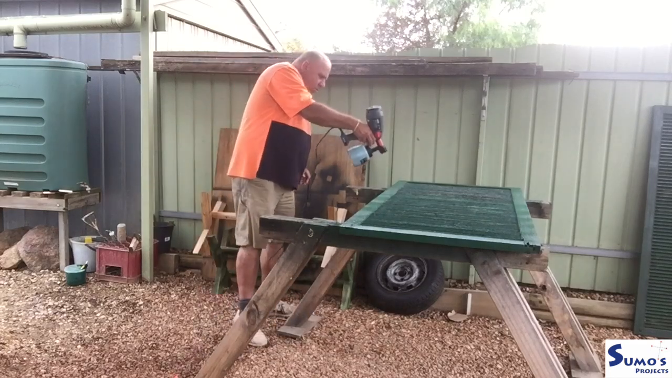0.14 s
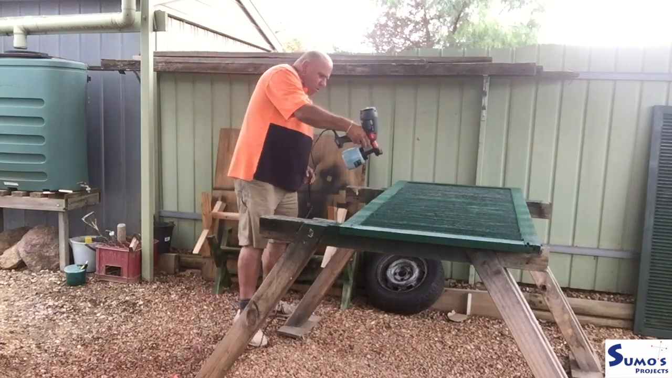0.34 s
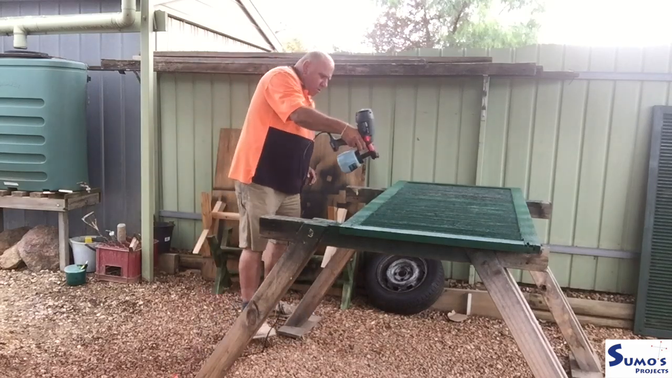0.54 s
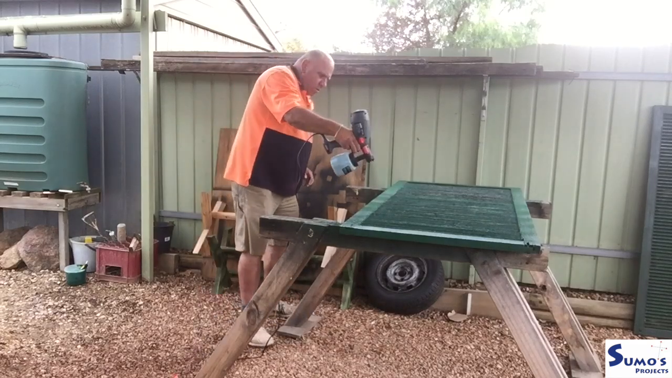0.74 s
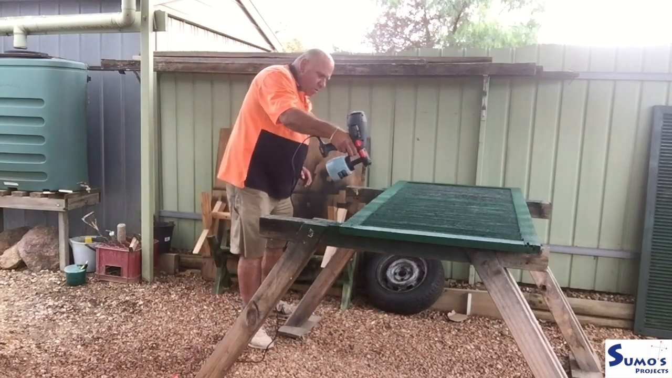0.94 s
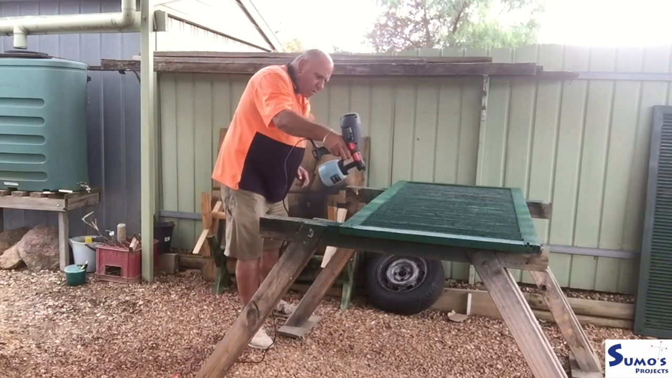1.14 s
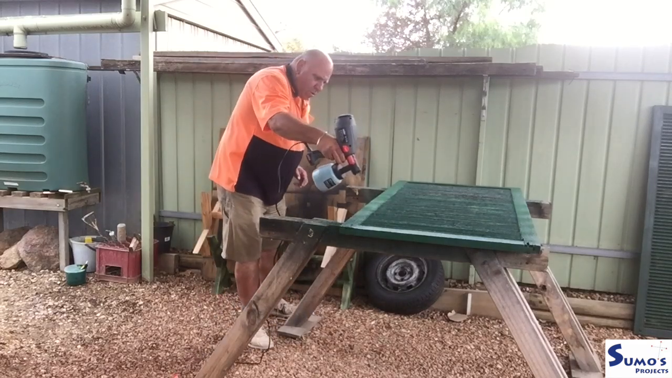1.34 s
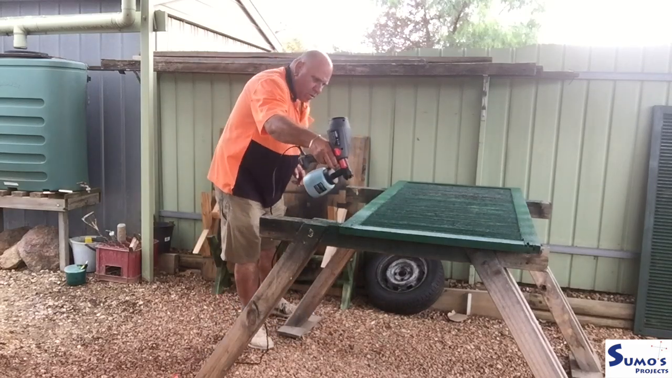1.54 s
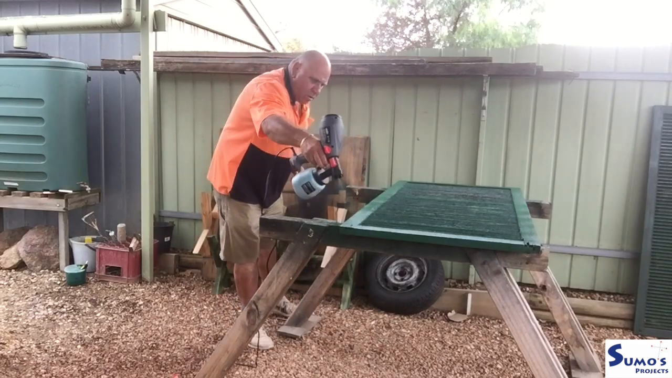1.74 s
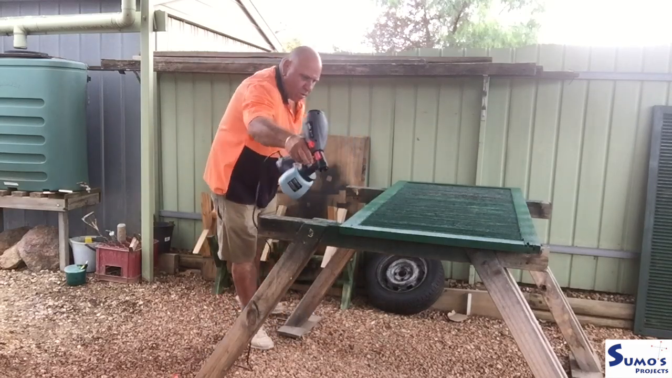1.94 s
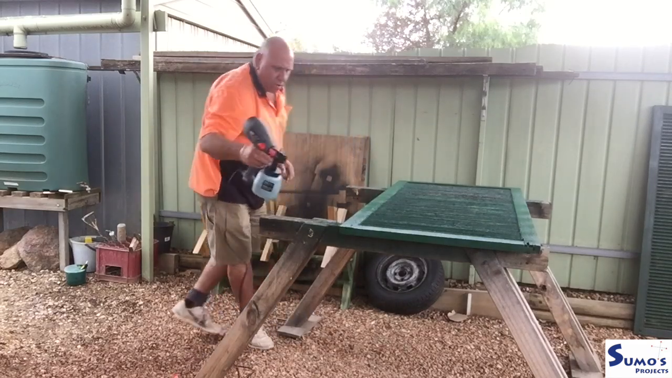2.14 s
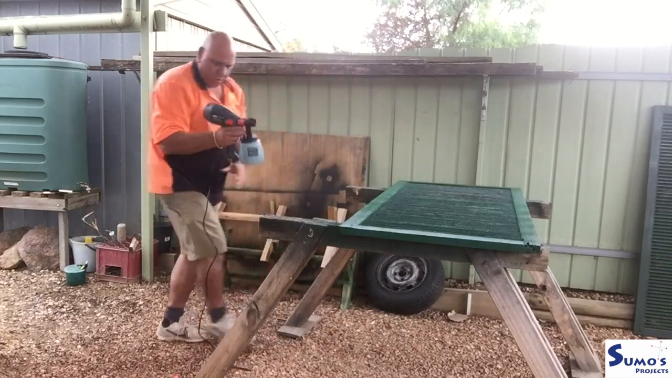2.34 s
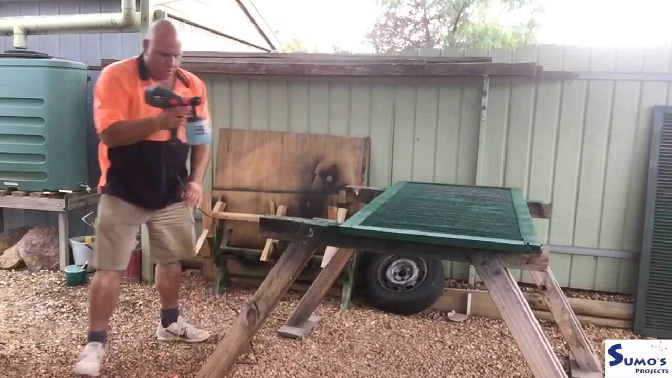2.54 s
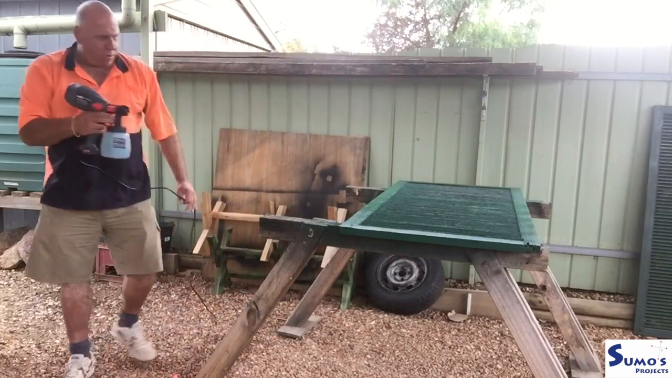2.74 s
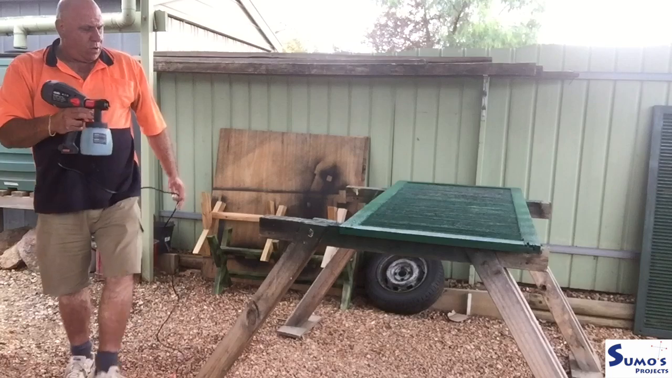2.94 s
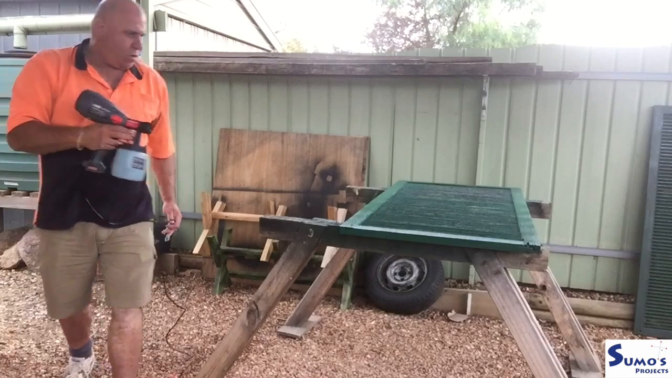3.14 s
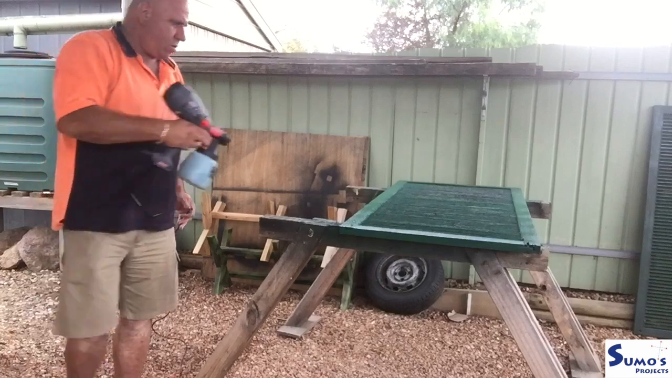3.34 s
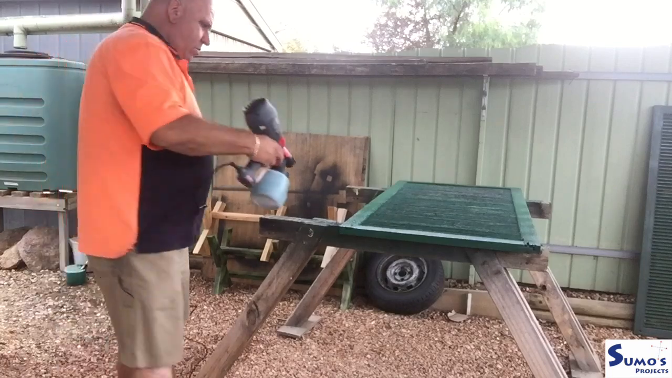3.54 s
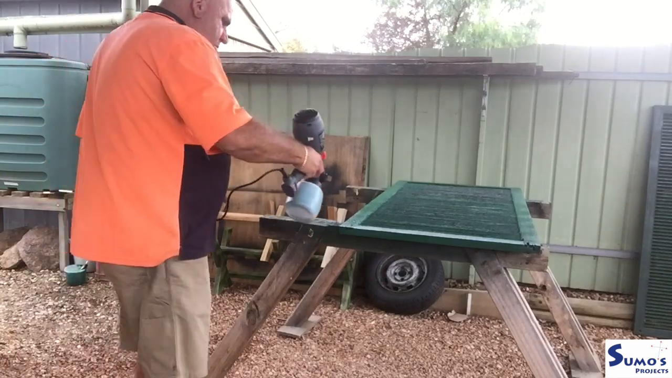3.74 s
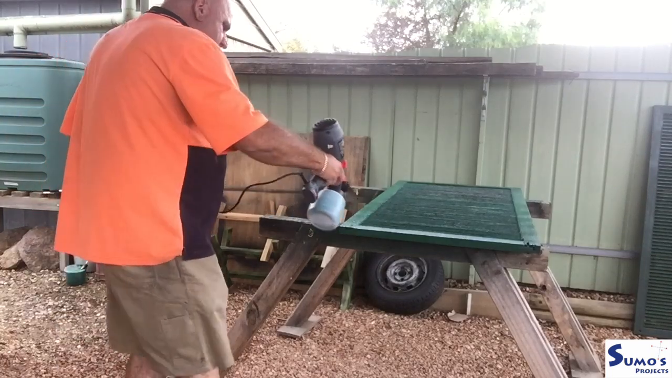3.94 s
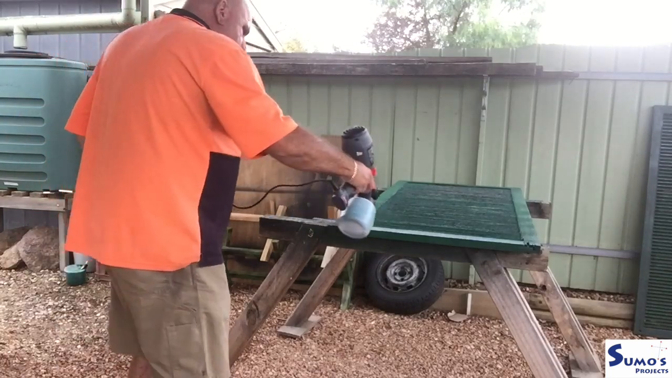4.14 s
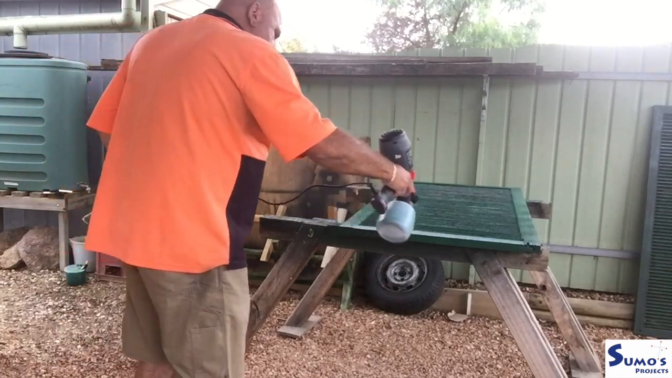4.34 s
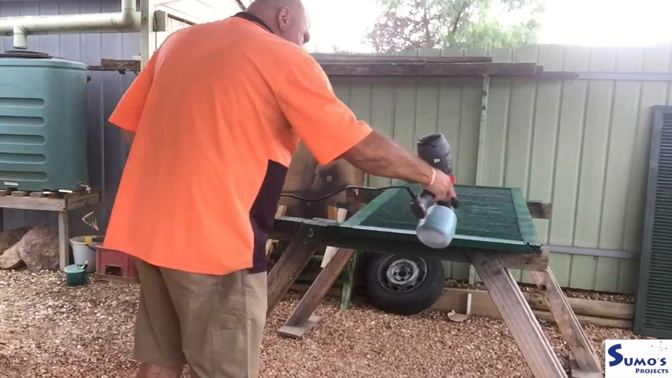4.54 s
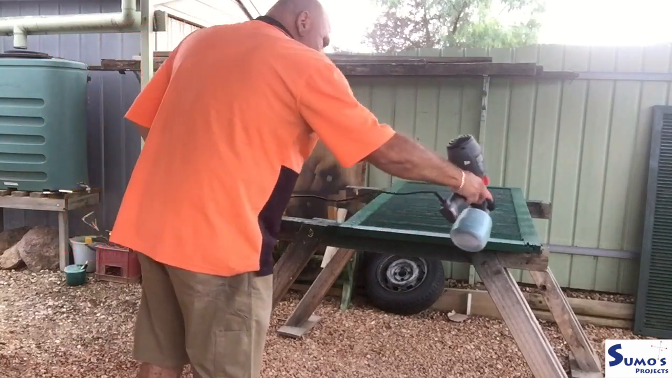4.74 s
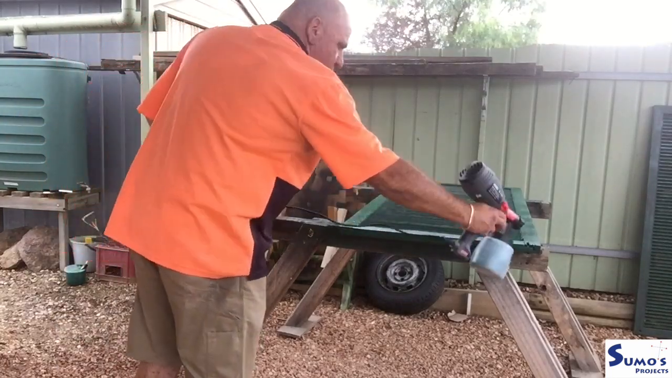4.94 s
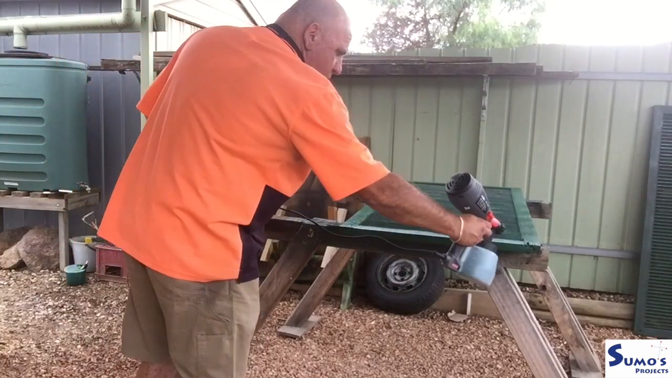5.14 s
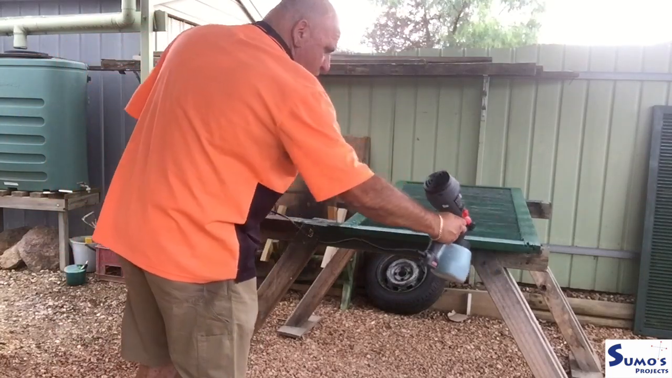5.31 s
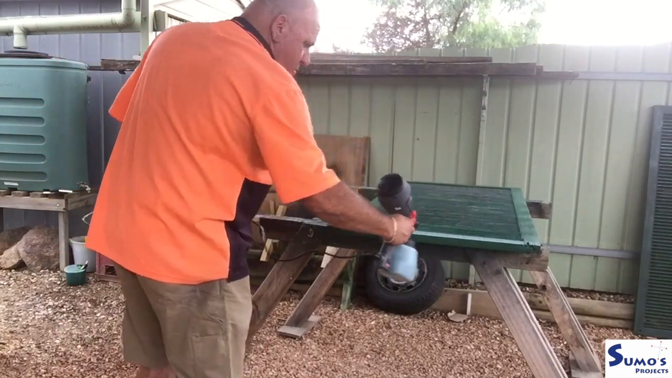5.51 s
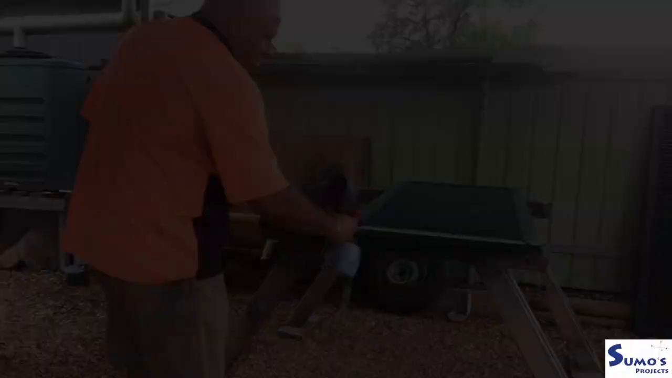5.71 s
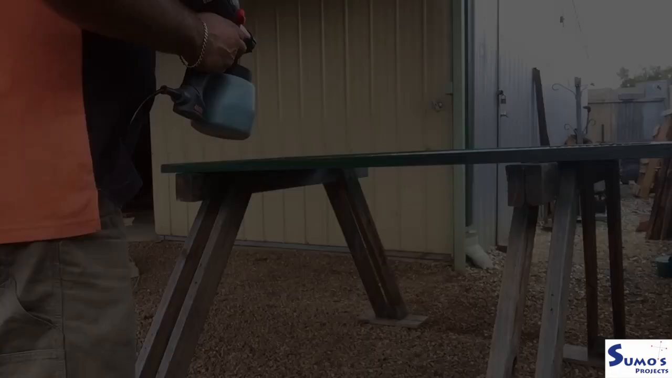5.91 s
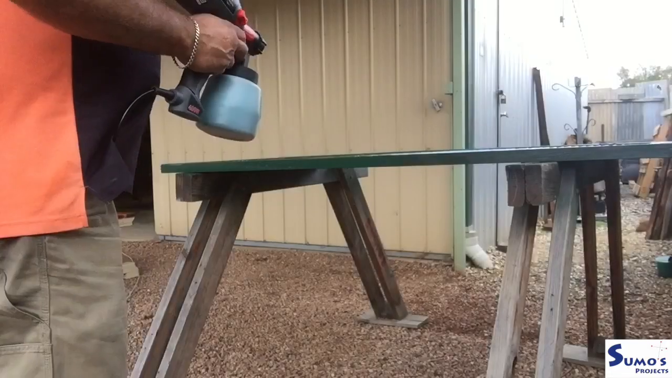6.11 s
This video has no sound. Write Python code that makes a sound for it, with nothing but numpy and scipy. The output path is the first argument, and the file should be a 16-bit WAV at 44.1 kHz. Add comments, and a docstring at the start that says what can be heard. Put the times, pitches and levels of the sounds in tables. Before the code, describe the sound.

Rushing air and a piercing turbine whine wind down, restart with a trigger click nearer, sag briefly, and stop abruptly before shoes crunch wood chips.

```python
"""A rush of air and the whine of a seven-blade turbine are heard first: a handheld electric paint sprayer in a yard.
It coasts down while carried round the bench, clicks on again close by, dips once, and a quiet yard cuts it off.
The air is noise shaped by resonances and echoes; the whine is a sine at the blade rate of a modelled shaft.
A distant engine hums in two orders, a far machine and traffic are coloured noise, and shoes scuff wood chips
in grainy bursts. Both channels carry the same sound."""
import sys
import numpy as np
from scipy import signal
from scipy.fft import rfft, irfft, next_fast_len
from scipy.io import wavfile
from scipy.ndimage import uniform_filter1d, map_coordinates

SR = 44100
rng = np.random.default_rng(int(sys.argv[2]) if len(sys.argv) > 2 else 0)


def materialize(psi):
    """Save the field psi as 16-bit PCM at rate SR to the path in sys.argv[1].

    A 1-D psi becomes a single channel; in a 2-D psi each row is a channel.
    """
    bounded = np.clip(np.atleast_2d(psi).T, -1, 1)
    quanta = np.round(bounded * 32767).astype(np.int16)
    wavfile.write(sys.argv[1], SR, quanta)


N = 272176

# Level of the yard noises. Each row: time in seconds, far machine drone in dB, traffic rumble in dB.
YARD = [(0, -77, -70), (1.1, -74.5, -68.5), (1.5, -72, -63), (1.8, -75, -69), (2.3, -71, -63),
        (2.7, -73, -66.5), (3.7, -76.5, -71), (4.3, -75, -68.5), (4.65, -85.5, -69.5), (5.45, -86.5, -66),
        (5.86, -93, -70.5)]
# Colour of the far machine drone. Each row: frequency in Hz, relative density in dB.
DRONE = [(12, -76), (60, -37), (85, -13), (105, -6), (114, 3.5), (125, -5.5), (140, -11), (300, -86.5)]
# Colour of the traffic rumble. Each row: frequency in Hz, relative density in dB.
RUMBLE = [(12, -78), (90, -24.5), (150, -7), (200, -5), (300, -6.5), (400, -10), (550, -14.5), (800, -21.5),
          (1200, -35), (4000, -45.5), (16000, -33)]
# Colour of the quiet yard at the end. Each row: frequency in Hz, relative density in dB.
QUIET = [(12, -48), (20, -20), (61, -17.5), (82, -11.5), (119, -19), (268, -20), (361, -28.5), (1320, -29),
         (3500, -40.5), (12800, -46), (16600, -67), (22000, -120)]
QUIET_DB, QUIET_TOP_HZ = -80, 12900
# The jump to the quiet yard: start of the fade in seconds, end in seconds.
JUMP = (5.83, 5.858)
# Distant engine. Each row: time in seconds, second order in Hz, its level in dB, third order level in dB.
ENGINE = [(2.2, 210, -98, -94), (2.6, 210, -80, -84), (2.85, 210, -82, -79), (2.92, 210, -83, -71),
          (3.0, 210, -80, -74), (3.1, 208, -73, -72), (3.22, 210, -67, -70), (3.4, 209.5, -67.5, -73),
          (3.58, 207.5, -68.5, -77), (3.75, 205.5, -64, -78), (3.81, 206, -69, -80),
          (3.95, 205, -65.5, -84), (4.06, 192, -66, -88), (4.2, 188, -68, -91), (4.45, 187, -68, -90),
          (4.75, 186.5, -72, -88), (4.9, 185, -99, -87)]
# Shoes in wood chips. Each row: start in seconds, level before the envelope in dB, rise constant in seconds,
# time to fall 60 dB in seconds, brightness in dB per octave.
SCUFFS = [(3.599, -75, .01, 0.15, 6), (3.651, -76, 0.043, 0.46, -9), (5.93, -85, 0.0077, 0.26, 11),
          (6.0, -69, 0.013, 0.13, 9), (6.042, -59.5, 0.0034, 0.14, -1.5), (6.053, -61, 0.0013, 0.15, 4)]
# Trigger switch contacts. Each row: start in seconds, level before the envelope in dB, pitch in Hz.
CLICKS = [(3.5753, -45, 2000), (3.5782, -49, 2100), (3.5803, -49, 2700), (3.6065, -58, 1300),
          (3.7166, -35, 5400)]
CLICK_CYCLES = 7  # cycles to fall 60 dB
# Rattle of the loose trigger. Each row: start in seconds, level before the envelope in dB,
# time to fall 60 dB in seconds, brightness in dB per octave.
RATTLES = [(3.575, -61, .06, -11), (3.606, -71, .04, -10), (3.7168, -57, .12, 3)]
# Colour of the rattle before its brightness tilt. Each row: frequency in Hz, relative density in dB.
SWITCH = [(300, -70), (600, -26), (1200, -9), (2400, 0), (4200, -6), (5200, -10), (7000, -16), (15000, -28)]

# Trigger held. Each row: on in seconds, off in seconds, full blade rate in Hz, shaft tone in dB.
RUNS = [(0, 1.965, 8946, -61), (3.716, 4.873, 8897, -61.5), (5.031, 6.2, 8866, -62.5)]
BLADES, BARS = 7, 11  # blades, and brush contacts per turn of the shaft
START_HZ, SAG_HZ_PER_S = 7675, 22.6  # blade rate at the start; slow droop under load
SPIN_S, KICK_S, KICK = .1406, .037, .421  # spin-up constant; onset and share of extra torque from low speed
COAST_S, FRICTION_HZ, DRAG_S, DRAG = 3.14, 6107, .405, .239  # bearing friction, and air drag at first
RUSH_LAW_DB, HISS_LAW_DB, BOOM_LAW_DB, BLADE_LAW_DB = 31.5, 49, 21, 34.5  # per tenfold speed
UNLOADED_DB, SHAFT_LAW_DB = -15, 62  # shaft tone without current, and its growth per tenfold speed
# Beamed blade tone, swinging past as the gun sweeps. Each row: time in seconds, level at full speed in dB.
BEAM = [(0, -66), (.05, -70), (.085, -55), (.11, -59), (.15, -51), (.29, -52), (.33, -58), (.39, -60),
        (.44, -55), (.485, -47), (.53, -66), (.58, -48), (.64, -56), (.9, -53), (1.14, -48), (1.45, -54.5),
        (1.65, -53), (1.76, -55.5), (1.9, -50), (1.94, -59), (1.975, -52), (2.03, -62), (2.1, -63),
        (2.185, -53), (2.22, -62), (2.28, -63), (2.31, -57), (2.37, -66), (2.44, -57), (2.52, -61),
        (2.56, -68), (2.6, -60), (2.66, -58), (2.71, -68), (2.77, -60), (2.84, -50), (2.88, -60),
        (2.92, -55), (3.03, -53), (3.15, -56), (3.4, -70), (3.8, -74), (3.825, -51), (3.865, -52),
        (3.89, -68), (3.91, -55), (3.945, -52), (3.97, -59), (4.0, -53), (4.05, -49), (4.1, -55),
        (4.36, -58.5), (4.5, -53), (4.76, -61), (4.85, -52), (4.93, -54), (4.99, -63), (5.05, -59),
        (5.12, -57), (5.3, -47), (5.45, -58.5), (5.62, -55), (5.75, -62.5), (5.83, -54.5)]
SWEEP_ECHO_S, SWEEP_DB = .0031, 2.5  # a changing blade tone flickers through the comb of its nearest echo
# Brush whine, in broken stretches as the rotor coasts and as a rising chirp at restart. Each row:
# start in seconds, end in seconds, harmonic of the brush contact rate, level before ringing and flicker in dB.
BRUSH_WHINE = [(2.8, 3.15, 1, -87), (3.1, 3.42, 1, -76), (3.36, 3.6, 1, -80), (3.1, 3.24, 2, -91),
               (3.34, 3.5, 2, -92), (3.44, 3.6, 2, -91), (3.12, 3.2, 3, -87), (3.2, 3.39, 3, -88),
               (3.36, 3.56, 3, -96), (3.6, 3.67, 3, -87), (3.28, 3.41, 4, -89), (3.38, 3.51, 4, -92),
               (3.47, 3.64, 4, -100), (3.718, 3.745, 1, -63), (3.735, 3.775, 1, -68)]
# The housing rings as the whine passes its resonance, and harder under starting current.
SHELL_HZ, SHELL_WIDTH_HZ, SHELL_DB, STARTING_DB = 3800, 600, 3, 13

# Colour of the air behind the bench. Each row: frequency in Hz, relative density in dB.
BEHIND = [(190, -63), (330, -15.5), (574, -5.5), (908, -11), (1240, -7), (1340, -6), (1740, -2), (2900, -6),
          (3230, -3), (4170, -14), (6690, -19.5), (8300, -22.5), (10800, -27), (18300, -120)]
# Colour of the air while walking. Each row: frequency in Hz, relative density in dB.
WALKING = [(190, -51), (330, -7), (393, -23), (540, -3.5), (650, -13.5), (1060, -14), (1300, -12),
           (1600, -9.5), (2100, -4), (2940, -8.5), (3270, -7), (4280, -22), (4840, -27), (8300, -37),
           (10800, -36), (18300, -120)]
# Colour of the air close by. Each row: frequency in Hz, relative density in dB.
CLOSE = [(190, -48), (330, -13), (488, -7.5), (640, -17), (849, -12), (1050, -14), (1400, -5), (1960, -1.5),
         (2700, -4), (3320, -3.5), (4200, -13.5), (6450, -9), (7900, -14.5), (8300, -15.5), (10800, -43),
         (18300, -120)]
# Close by with the arm stretched over the bench. Each row: frequency in Hz, relative density in dB.
REACHING = [(190, -47.5), (330, -12), (826, -15), (1160, -13), (1380, -5), (2100, -0.5), (2750, -4.5),
            (3360, 0), (4170, -13), (6420, -6), (7970, -12.5), (8300, -12.5), (10800, -43), (18300, -120)]
# The arm stretches: start in seconds, end in seconds.
REACH = (4.9, 5.2)
# Where the gun is. Each row: time in seconds, place (0 behind the bench, 1 walking, 2 close by).
PLACE = [(0, 0), (2.0, 0), (2.4, 1), (3.3, 1), (3.7, 2), (6.2, 2)]
# Narrow resonances that shift as the gun is turned and carried. Each row: time in seconds,
# low, middle and high frequency in Hz, then their three lifts in dB.
TURNING = [(0, 1953, 2700, 3200, 9, 5, 7), (.25, 1900, 2600, 3170, 8, 5, 6),
           (.4, 1870, 2530, 3170, 5, 8, 6), (.65, 1830, 2420, 3080, 8, 8, 8),
           (.9, 1790, 2380, 3020, 6, 6, 5), (1.0, 1750, 2370, 3320, 9, 4, 3),
           (1.2, 1700, 2310, 3220, 9, 7, 6), (1.35, 1600, 2060, 3170, 4, 3, 2),
           (1.55, 1550, 2140, 3200, 2, 5, 4), (1.8, 1590, 2160, 3240, 4, 6, -2),
           (2.1, 1610, 2320, 3250, 3, 10, 3), (2.3, 1700, 2250, 3150, 2, 7, 7),
           (2.43, 1740, 2220, 3340, 5, 4, 10), (2.57, 1800, 2400, 3580, 8, 1, 10),
           (2.65, 1860, 2450, 3450, 9, 0, 4), (2.75, 2130, 2500, 3235, 12.5, -5, 13),
           (2.95, 2165, 2550, 3320, 8, 10, 9), (3.2, 1920, 2400, 3400, 8, 0, 0),
           (3.45, 1580, 2420, 3370, -7, 1, 6), (4.3, 1940, 2460, 3380, 10, 5, 5.5),
           (4.9, 1920, 2700, 3050, 3, -2, 2.5), (5.6, 2130, 2430, 3280, 0, 1.5, -4)]
TURNING_WIDTH = .028  # share of the centre frequency
# A dark band that sinks in pitch with the resonances. Each row: time in seconds, centre in Hz, lift in dB.
DIP = [(0, 2950, -3), (.45, 2850, -7), (.95, 2650, -6), (1.3, 2560, -2), (1.6, 2500, 0)]
# Fixed air resonances of housing, duct and nozzle. Each row: centre in Hz, width in Hz,
# lift in dB behind the bench, lift in dB walking, lift in dB close by.
DUCT = [(490, 25, 0, 0, 3), (570, 35, 3, 3, 0), (840, 25, 0, 0, 4), (1560, 50, 3, 3, 4),
        (2420, 45, 3, 2, 4), (3700, 80, 3, 0, 1), (4560, 90, 3, 5, 4), (6350, 70, 1, 0, 4),
        (6700, 120, 3, 1, 3)]
# Echoes off bench, ground, body and fence. Each row: delay in seconds behind the bench, delay in seconds
# walking, delay in seconds close by (all before the stretch and wander), level in dB at low frequency.
ECHOES = [(.0015, .0017, .0015, -11), (.0034, .0029, .0024, -10), (.0043, .0045, .0037, -9),
          (.0061, .006, .0055, -9), (.008, .0075, .0086, -9), (.0112, .0105, .0105, -9),
          (.0145, .015, .014, -9.5), (.019, .02, .018, -10.5)]
# Echo paths lengthen as the first stroke moves away. Each row: time in seconds, stretch factor.
RECEDE = [(0, .92), (1.5, 1.08), (2.2, 1), (6.2, 1)]
# Air level before speed scaling, through carrying and restart. Each row: time in seconds, rush in dB,
# nozzle hiss in dB, housing boom in dB.
AIR_LEVEL = [(0, -46, -53, -59), (.7, -46, -54, -57.5), (1.6, -47.5, -51.5, -57), (1.9, -46.5, -52, -57.5),
             (2.4, -45, -50, -57), (2.86, -46, -50.5, -51), (3.27, -51.5, -56, -59.5),
             (3.56, -53.5, -63, -79), (3.7, -32.5, -34, -47), (3.74, -51, -45, -61), (3.77, -44, -55, -55),
             (3.83, -43.5, -51, -54), (4.0, -43.5, -52.5, -53), (4.8, -44, -52.5, -54.5),
             (5.2, -43, -53, -56), (5.86, -43, -52, -56.5)]
TOP_HZ = 15720  # upper band limit of the whole sound


def amp(db):
    """Level in decibels to amplitude ratio."""
    return 10 ** (np.asarray(db) / 20)


def unit(x):
    """Normalisation to an rms of 1."""
    return x / np.sqrt(np.mean(x ** 2) + 1e-20)


def along(points, hz):
    """Interpolation of (Hz, value) points on a logarithmic frequency axis."""
    f, v = np.transpose(points)
    return np.interp(np.log(hz + 1), np.log(f + 1), v)


def curves(rows, t=None):
    """Linear interpolation in time: one curve for each column after the time."""
    s, *cols = np.transpose(rows)
    moments = np.arange(N) / SR if t is None else t
    return [np.interp(moments, s, c) for c in cols]


def wobble(rate):
    """Slow random modulation: a smooth curve through random knots, rate knots a second."""
    knots = rng.standard_normal(int(N * rate / SR) + 4)
    return map_coordinates(knots, [np.arange(N) * rate / SR])


def filtered(x, response):
    """Linear filtering: the spectrum of x times a response of frequency."""
    m = next_fast_len(len(x) + 8192)
    return irfft(rfft(x, m) * response(np.fft.rfftfreq(m, 1 / SR)), m)[:len(x)]


def noise(spectrum, size=N):
    """Coloured noise: white noise shaped by a spectrum, at rms 1."""
    white = rng.standard_normal(size)
    return unit(filtered(white, lambda hz: amp(along(spectrum, hz))))


def quiet_yard():
    """Yard ambience: faint band-limited noise of slowly varying level."""
    return amp(QUIET_DB + 3.0 * wobble(27)) * filtered(noise(QUIET), lambda hz: hz < QUIET_TOP_HZ)


def drone_and_traffic():
    """Superposed distant sources: a narrow-band machine drone and a broad traffic rumble."""
    drone_db, rumble_db = curves(YARD)
    return amp(drone_db) * noise(DRONE) + amp(rumble_db + 1.1 * wobble(5.41)) * noise(RUMBLE)


def engine():
    """Order excitation: two low multiples of the shaft rate of an engine passing far off and changing gear."""
    hz, second_db, third_db = curves(ENGINE)
    turn = np.pi * np.cumsum(hz) / SR  # shaft angle, half the second-order phase
    second = amp(second_db + 1.8 * wobble(20)) * np.sin(2 * turn)
    third = amp(third_db + 2.5 * wobble(12)) * np.sin(3 * turn)
    return np.sqrt(2) * (second + third)


def shoes():
    """Granular friction: chips crunch as spiky grains under a short rise and a longer settling."""
    out, t = np.zeros(N + SR), np.arange(SR // 2) / SR
    for s, db, rise, t60, tilt_db in SCUFFS:
        grain_db = 2.8 * rng.standard_normal(len(t) // 64 + 1).repeat(64)[:len(t)]
        grains = rng.standard_normal(len(t)) * amp(grain_db)

        def colour(hz):
            thud_db = 10.0 * (hz < 380)  # the heel
            band = (hz < QUIET_TOP_HZ) * (hz > 110)
            return amp(tilt_db * np.log2(hz / 3000 + .05) + thud_db) * band

        envelope = amp(db - 60 * t / t60) * (1 - np.exp(-t / rise))
        out[round(s * SR):][:len(t)] += envelope * unit(filtered(grains, colour))
    return out[:N]


def trigger():
    """Damped impact: short dull plastic ticks as decaying sines, each group followed by a faint noisy rattle."""
    out, t = np.zeros(N), np.arange(4096) / SR
    for s, db, hz in CLICKS:
        envelope = amp(db - 60 * t * hz / CLICK_CYCLES) * (1 - np.exp(-3 * t * hz))
        out[round(s * SR):][:len(t)] -= envelope * np.sin(2 * np.pi * hz * t)
    for s, db, t60, tilt_db in RATTLES:
        colour = [(hz, level + tilt_db * np.log2(hz / 2800)) for hz, level in SWITCH]
        envelope = amp(db - 60 * t / t60) * (1 - np.exp(-t / .001))
        out[round(s * SR):][:len(t)] += envelope * noise(colour, size=len(t))
    return out


def spin_up(u, start_hz, full_hz):
    """Motor torque: the blade rate closes exponentially on full speed, faster from low speed."""
    kick = KICK * (1 - start_hz / full_hz) * (1 - np.exp(-(u / KICK_S) ** 2))
    gap_hz = (full_hz - start_hz) * np.exp(-u / SPIN_S) * (1 - kick)
    return full_hz - SAG_HZ_PER_S * u - gap_hz


def coast_down(u, top_hz):
    """Frictional decay: bearings slow the free rotor, helped at first by air drag."""
    drag = 1 + DRAG * (1 - np.exp(-u / DRAG_S))
    return (top_hz + FRICTION_HZ) * np.exp(-u / COAST_S) / drag - FRICTION_HZ


def speed(t):
    """Rotor dynamics: blade rate in Hz, driven while the trigger is held and coasting when let go."""
    hz, rate = np.zeros_like(t), START_HZ
    next_starts = [run[0] for run in RUNS[1:]] + [np.inf]
    for (on, off, full_hz, _), again in zip(RUNS, next_starts):
        top_hz = spin_up(off - on, rate, full_hz)
        driven = spin_up(abs(t - on), rate, full_hz)
        free = coast_down(abs(t - off), top_hz)
        hz = np.where(t >= on, np.where(t < off, driven, free), hz)
        rate = coast_down(again - off, top_hz)
    return hz


def slower(hz):
    """Logarithmic speed scaling: tenfolds relative to the first full speed, negative below it."""
    return np.log10(hz / RUNS[0][2])


def turbine():
    """Blade-passing tone: blades sing at seven times the shaft rate, the unbalanced shaft at its own, brushes whine."""
    t = np.arange(N) / SR
    blade_hz = speed(t)
    turn = 2 * np.pi * np.cumsum(blade_hz) / SR / BLADES  # shaft angle
    blade_db = curves(BEAM)[0] + BLADE_LAW_DB * slower(blade_hz) + 1.2 * wobble(14)
    blade_db += SWEEP_DB * (np.cos(2 * np.pi * (blade_hz - RUNS[1][2]) * SWEEP_ECHO_S) - 1)
    blade = amp(blade_db + 3.2 * wobble(45)) * np.sin(BLADES * turn + 0.3 * wobble(70))
    skirt = amp(blade_db - 10.5) * wobble(260) * np.sin(BLADES * turn)  # eddies smear part of the tone

    held = sum(((t > on) & (t < off)) * amp(db) for on, off, _, db in RUNS)
    held = held + amp(RUNS[0][3] + UNLOADED_DB)
    shaft_level = uniform_filter1d(held, size=2000) * amp(SHAFT_LAW_DB * slower(blade_hz) + 1.5 * wobble(9))
    shaft = shaft_level * amp(0.18 * wobble(23)) * np.sin(turn + 0.16 * wobble(30))
    out = blade + skirt + shaft

    for t0, t1, harmonic, db in BRUSH_WHINE:
        swell = np.sin(np.pi * np.clip((t - t0) / (t1 - t0), 0, 1))
        whine_hz = harmonic * BARS * blade_hz / BLADES
        resonance = np.exp(-((whine_hz - SHELL_HZ) / SHELL_WIDTH_HZ) ** 2)
        ring_db = (SHELL_DB + STARTING_DB * (t > RUNS[1][0])) * resonance
        whine = np.sin(harmonic * BARS * turn + 1.5 * wobble(250))
        out += swell * amp(db + ring_db + 4 * wobble(90)) * whine
    return np.sqrt(2) * out


def air_colour(f, t, share):
    """Resonant filtering: density in dB over frequency and time, following the place and the turn of the gun."""
    # the last two points of each colour are left out, so it stays flat above the rest
    shape = sum(w * along(s[:-2], f) for w, s in zip(share, (BEHIND, WALKING, CLOSE)))
    reach = np.clip((t - REACH[0]) / (REACH[1] - REACH[0]), 0, 1)
    shape += reach * (along(REACHING[:-2], f) - along(CLOSE[:-2], f))
    tracks = curves(TURNING, t)
    for track_hz, lift_db in zip(tracks[:3], tracks[3:]):
        shape += lift_db * np.exp(-((f / track_hz - 1) / TURNING_WIDTH) ** 2)
    dip_hz, dip_db = curves(DIP, t)
    shape += dip_db * np.exp(-((f - dip_hz) / 110) ** 2)
    for centre_hz, width_hz, *lifts in DUCT:
        shape += np.dot(lifts, share) * np.exp(-((f - centre_hz) / width_hz) ** 2)
    return shape


def echo_comb(f, t, share):
    """Comb interference: wandering delayed paths add to the direct one, each carrying less treble."""
    paths = 1
    for *delays, db in ECHOES:
        wander = 1 + .02 * np.interp(t, np.arange(N) / SR, wobble(1.4))
        delay = np.dot(delays, share) * curves(RECEDE, t)[0] * wander
        paths = paths + amp(db) / (1 + (f / 7000) ** 2) * np.exp(-2j * np.pi * f * delay)
    return abs(paths)


def air():
    """Turbulence noise: air through intake, housing and nozzle, whose level grows as a power of the speed."""
    hz, t, z = signal.stft(rng.standard_normal(N), SR, nperseg=2048, noverlap=1536)
    f = hz[:, None]
    place, = curves(PLACE, t)
    share = [np.clip(1 - abs(place - k), 0, 1) for k in range(3)]
    gain = amp(air_colour(f, t, share)) * echo_comb(f, t, share)

    laws_db = np.outer([RUSH_LAW_DB, HISS_LAW_DB, BOOM_LAW_DB], slower(speed(t)))
    rush_db, hiss_db, boom_db = curves(AIR_LEVEL, t) + laws_db

    def band_lift(db, lo, hi):
        """Band power balance: the lift in dB that brings a band to its level."""
        band_power = np.sum(gain[(hz > lo) & (hz < hi)] ** 2, axis=0) / len(hz)
        return db - 10 * np.log10(band_power)

    boom = band_lift(boom_db, 400, 1000)
    rush = band_lift(rush_db, 1100, 4200)
    hiss = band_lift(hiss_db, 9300, 15500)
    # the three lifts meet in smooth cross-overs
    up = 1 / (1 + (1050 / (f + 1)) ** 12)
    top = 1 / (1 + (5200 / (f + 1)) ** 6)
    lift_db = boom * (1 - up) + rush * up * (1 - top) + hiss * up * top
    gusts = uniform_filter1d(rng.standard_normal(z.shape), size=60, axis=0)
    gusts = uniform_filter1d(gusts, size=6, axis=1)
    gain *= amp(lift_db + 1.12 * unit(gusts))
    return signal.istft(z * gain, SR, nperseg=2048, noverlap=1536)[1][:N]


def scene():
    """Superposition: all sources add, and a short cross-fade leads from the sprayer to the quiet yard."""
    t = np.arange(N) / SR
    stay = np.clip((JUMP[1] - t) / (JUMP[1] - JUMP[0]), 0, 1)
    spraying = drone_and_traffic() + engine() + trigger() + turbine() + air()
    mono = stay * spraying + (1 - stay) * quiet_yard() + shoes()
    return np.array([mono, mono])


def record(dry):
    """Band limitation: nothing is kept above a steep upper edge."""
    def edge(hz):
        return np.clip((TOP_HZ - hz) / 120 + .5, 0, 1) ** 2
    return np.array([filtered(x, edge) for x in dry])


dry = scene()
out = record(dry)
materialize(out)
```